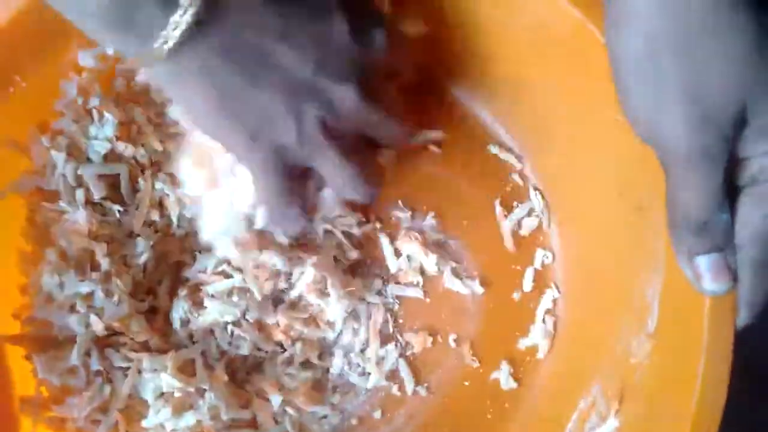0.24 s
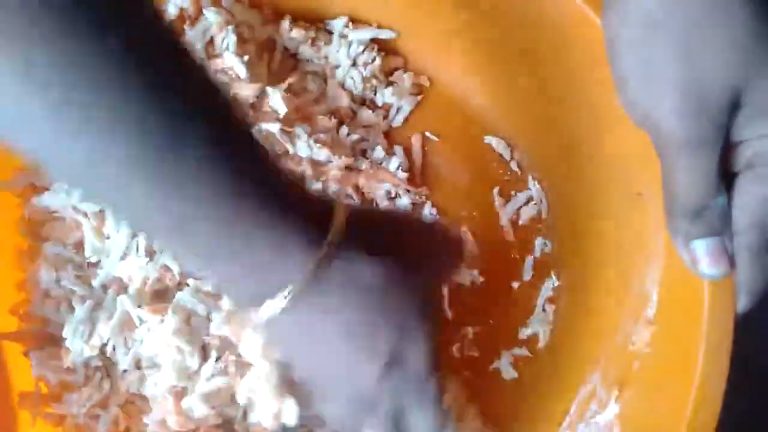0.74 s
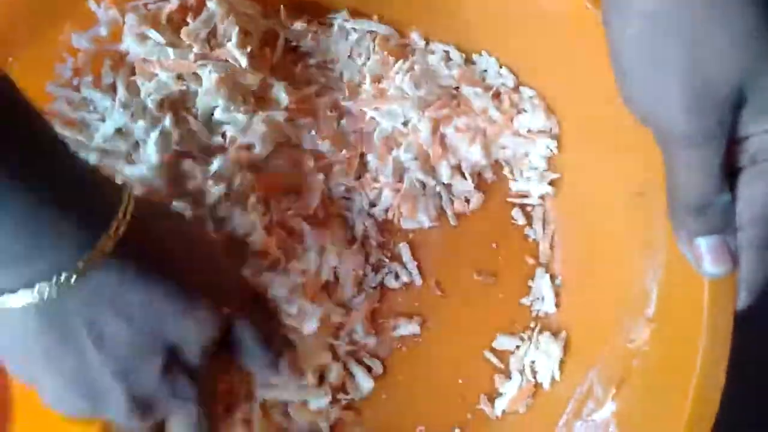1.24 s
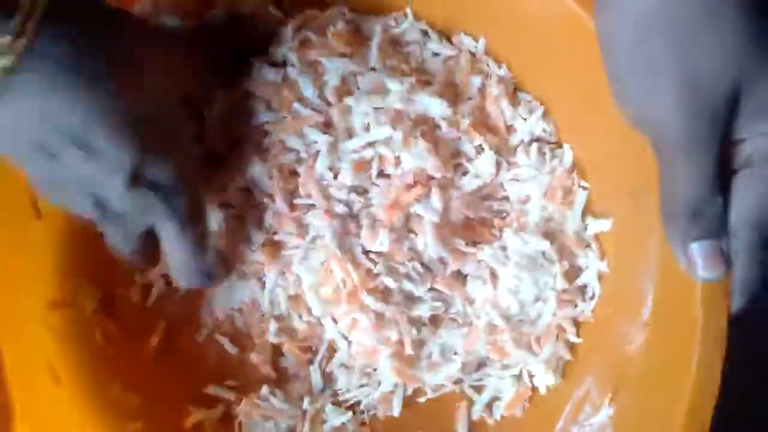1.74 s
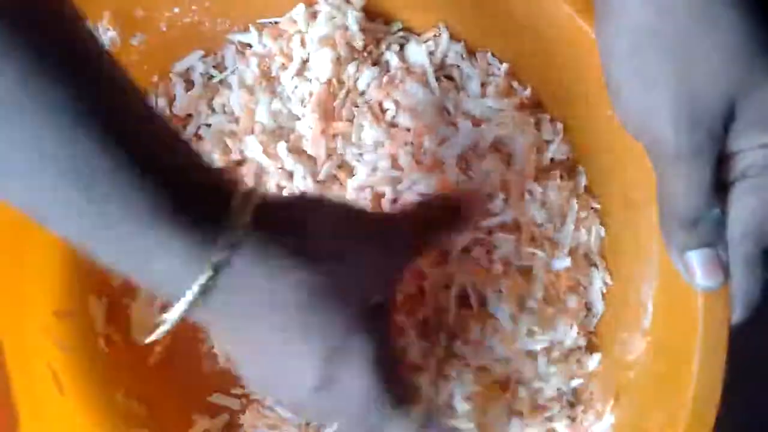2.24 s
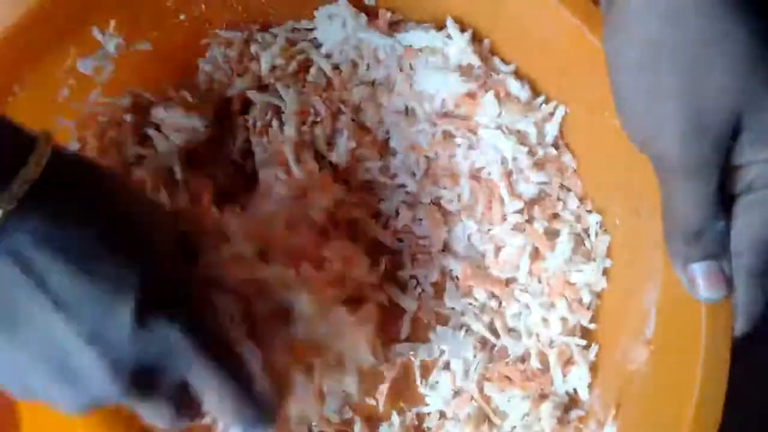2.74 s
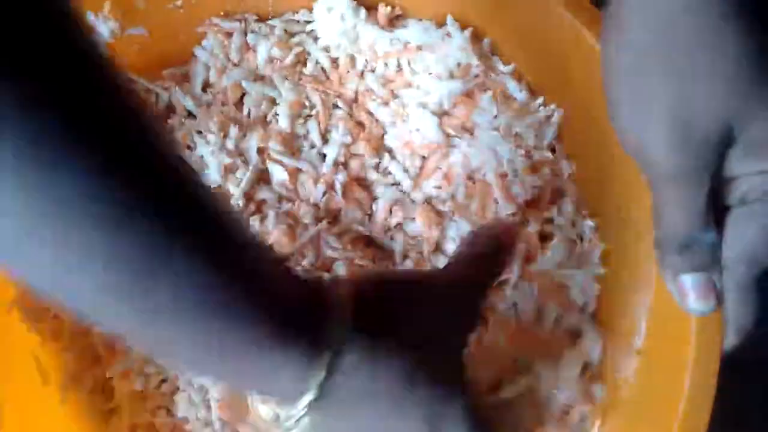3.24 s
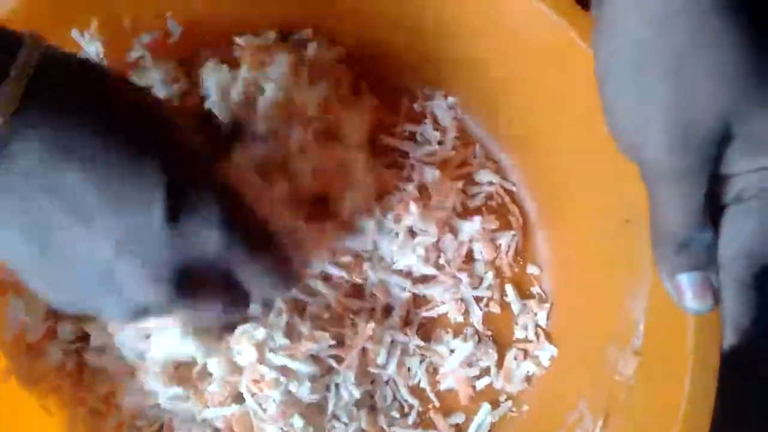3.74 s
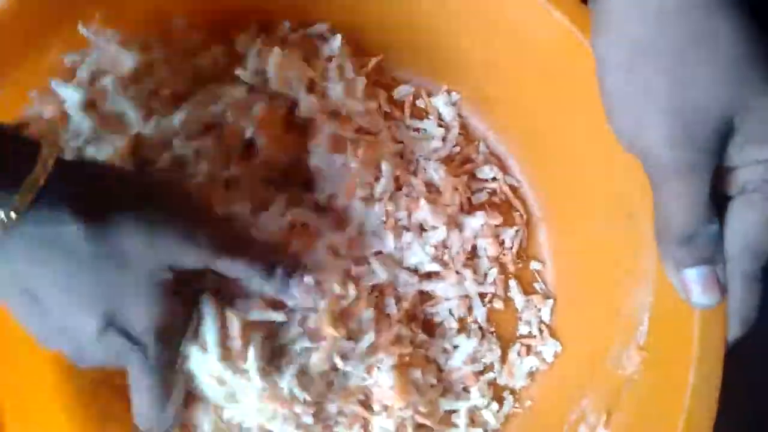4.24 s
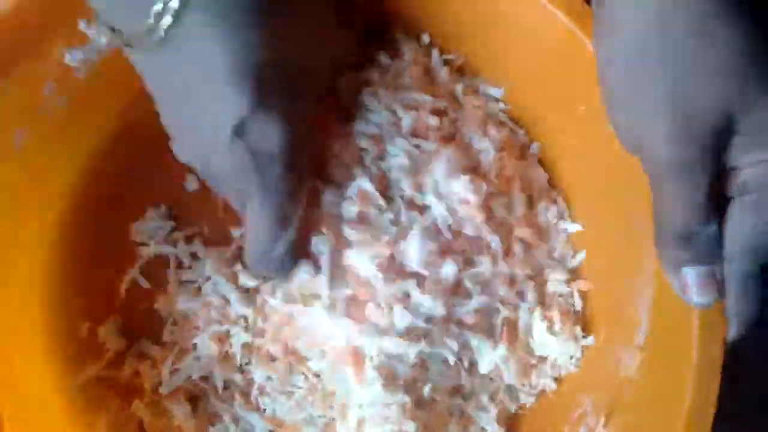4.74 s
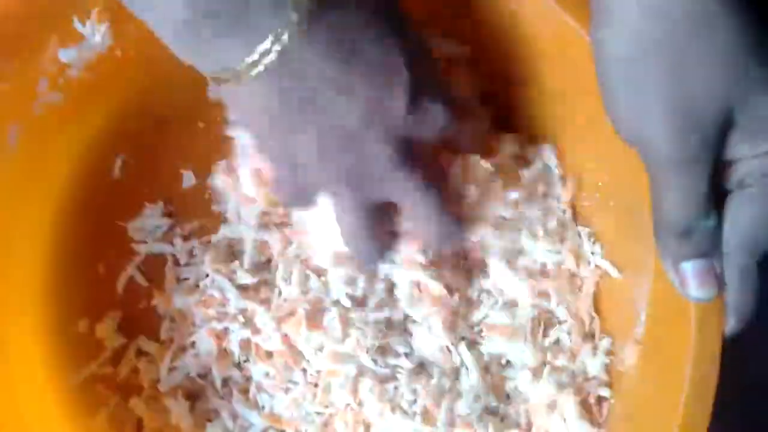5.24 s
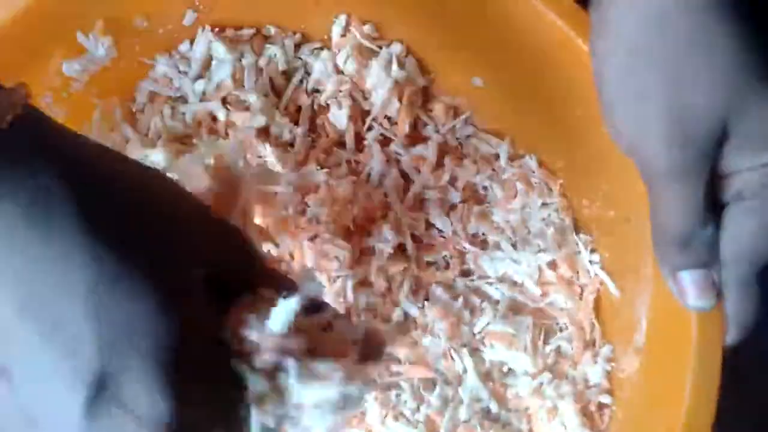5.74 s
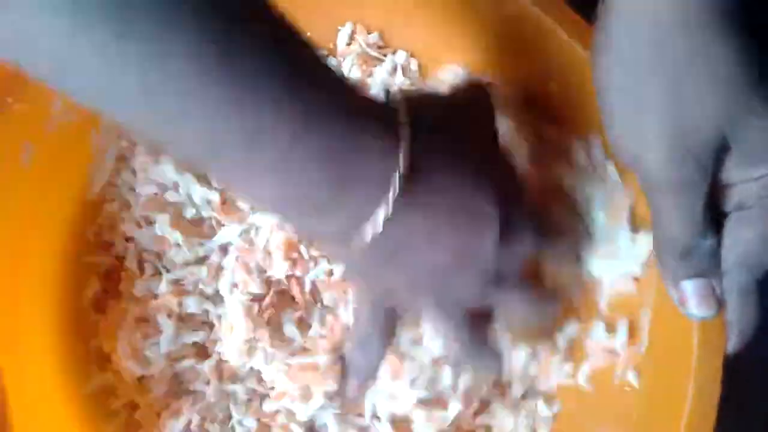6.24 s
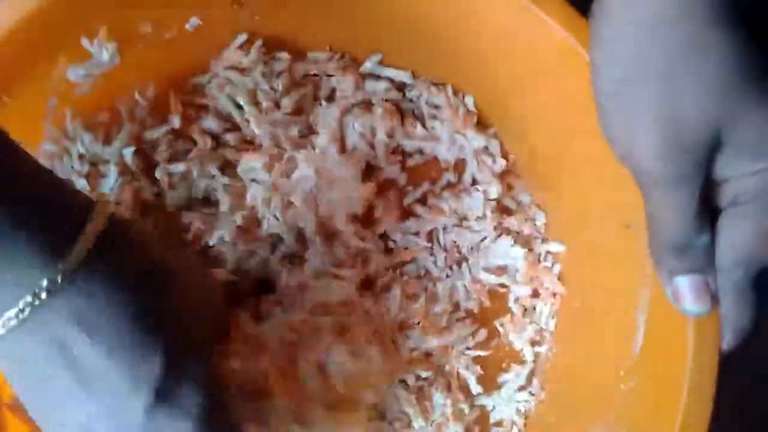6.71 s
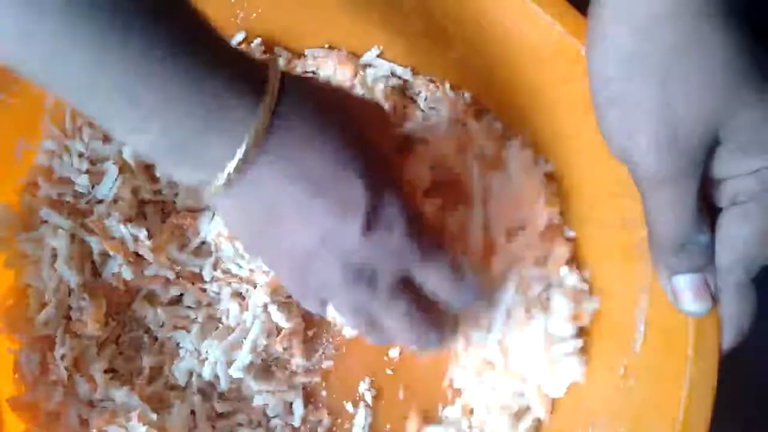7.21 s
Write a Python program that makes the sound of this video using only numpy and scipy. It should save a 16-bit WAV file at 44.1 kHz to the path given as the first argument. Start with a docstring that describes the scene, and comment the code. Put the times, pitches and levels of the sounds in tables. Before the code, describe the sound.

Close up in a small kitchen, a hand sweeps moist grated vegetables around a plastic bowl in short rustling strokes. Fingers and clumps tap the wall with brief hollow ticks, and tiny shreds snap. A hard knock rings out just before two seconds and another just before five. A distant hoarse crow calls faintly three times over low room hum and soft hiss.

```python
"""Grated vegetables stirred by hand

A hand stirs and squeezes grated vegetables in a plastic bowl, close to a mono microphone in a small kitchen.
Each sweep is made of tiny stick-slip clicks: moist shreds rustle, rub the bowl and fizz as they part.
Fingers and falling clumps set the modes of the bowl ringing; twice it is knocked hard, once it is shoved.
A distant bird, probably a crow, calls three times in wavering harmonics over the low hum of the kitchen."""
import sys
import numpy as np
from scipy import signal
from scipy.fft import rfft, irfft
from scipy.io import wavfile

SR = 44100
rng = np.random.default_rng(int(sys.argv[2]) if len(sys.argv) > 2 else 0)


def to_wav(sig):
    """Store sig (one row per channel, or 1-D mono) as 16-bit WAV at the path in sys.argv[1].

    Samples outside -1..1 are clipped; the rate is SR.
    """
    pcm = np.clip(np.atleast_2d(sig), -1, 1) * 32767
    pcm = np.round(pcm).astype(np.int16)
    wavfile.write(sys.argv[1], SR, pcm.T)  # frames by channels


N = 329423
BLOW_TIME = np.arange(6000) / SR  # seconds after a blow


def amp(db):
    """Decibels to gain."""
    return 10 ** (np.asarray(db) / 20)


def unit(x):
    """Scales to rms 1."""
    return x / np.sqrt(np.mean(x ** 2) + 1e-20)


def topped(x):
    """Scales to peak 1."""
    return x / abs(x).max()


def read(points, hz):
    """Reads a table on a log-frequency axis."""
    f, value = np.transpose(points)
    return np.interp(np.log(hz + 1), np.log(f + 1), value)


def add(mix, s, sound):
    """Mixes a sound in at time s."""
    part = mix[round(s * SR):][:len(sound)]
    part += sound[:len(part)]


def colour(x, points, size=2048):
    """Causal filter with the given spectrum: clicks keep a sharp front and ring afterwards."""
    log_gain = np.log(amp(read(points, abs(np.fft.fftfreq(size, 1 / SR)))))
    minimum_phase = np.exp(signal.hilbert(log_gain).conj())
    impulse = np.fft.ifft(minimum_phase).real[:size // 2]
    return signal.oaconvolve(x, impulse)[:len(x)]


def wander(rate_hz):
    """Smooth chance of rms 1, rolling off above the given rate."""
    hz = np.fft.rfftfreq(N, 1 / SR)
    spectrum = rfft(rng.standard_normal(N)) / (1 + (hz / rate_hz) ** 4)
    return unit(irfft(spectrum, N))


def slips(per_s, spread_db, clump_db, clump_hz):
    """Tiny stick-slip clicks of uneven size and either sign that come in clumps."""
    size = amp(spread_db * np.minimum(rng.exponential(1, N), 4)) * rng.choice([-1, 1], N)
    happens = rng.random(N) < per_s / SR
    return size * happens * amp(clump_db * wander(clump_hz))


def mode(hz, t60):
    """One dying vibration."""
    return np.sin(2 * np.pi * hz * BLOW_TIME) * amp(-60 * BLOW_TIME / t60)


def radiate(x, low_hz, order=4):
    """A small open bowl cannot push out the slow part of a blow."""
    return signal.sosfilt(signal.butter(order, low_hz, "high", fs=SR, output="sos"), x)


# Modes of the bowl wall. Each row: pitch in Hz, level in dB before the place of the blow counts, t60 in s.
BOWL = [(485, -9.5, 0.13), (607.7, -7, 0.097), (697, -10.5, 0.088), (910, -7, 0.064), (937, -12, 0.11),
        (1082, -46, 0.052), (1181, 1, 0.04), (1258, -5, 0.056), (1419, 2.5, 0.054), (1564, -1.5, 0.061),
        (1684, 5, 0.026), (1930, -4, 0.1), (2400, -42, 0.046), (2920, -20, 0.014), (3528, 3.5, 0.02),
        (4720, -3, 0.028), (5070, -32, .05), (5785, -7.5, 0.041)]


def wall(spot_hz, focus_db, uneven_db):
    """The bowl's modes start together; focus_db favours those near the pitch of the struck spot."""
    chance = rng.standard_normal(len(BOWL))
    ringing = 0
    for luck, (hz, db, t60) in zip(chance, BOWL):
        off_spot_db = focus_db * np.log2(hz / spot_hz) ** 2
        ringing = ringing + amp(db - off_spot_db + uneven_db * luck) * mode(hz, t60)
    return topped(radiate(ringing, low_hz=438))


# Colour of a snap at the bowl. Each row: frequency in Hz, relative level in dB per Hz.
CRACK = [(300, -6.5), (1200, 6.5), (2600, 0.5), (4000, -3), (5200, -5), (7500, -6.5), (9000, -21),
         (11000, -20.5), (16000, -11)]


def crack(decay_s, tone):
    """The bright snap at the moment of contact: a short burst of coloured noise."""
    burst = rng.standard_normal(len(BLOW_TIME)) * np.exp(-BLOW_TIME / decay_s)
    return topped(colour(burst, tone))


# Low hum of the kitchen, then the hiss. Each row: frequency in Hz, relative level in dB per Hz.
HUM = [(12, -38), (20, 7), (47, -18.5), (63, 1.5), (78, -11), (87, -7), (135, 2), (177, -4.5), (219, -2.5),
       (302, -17.5), (340, -22), (440, -46), (750, -120)]
HISS = [(200, 17), (380, 15), (600, 16), (1200, 2.5), (2000, 9), (3500, -4), (8000, -1.5), (11000, -4.5),
        (13500, -1), (15500, 4.5)]
# Bumps in the microphone's hiss. Each row: centre in Hz, width in Hz, height in dB.
HISS_BUMPS = [(4600, 430, 15.2), (5530, 380, 15.2), (6480, 340, 16.4), (9200, 1030, 12.3)]
HUM_DB, HISS_DB = -55, -60  # rms levels


def background():
    """Low room hum, and the hiss of still air and of the microphone, as shaped noise."""
    hz = np.fft.rfftfreq(N, 1 / SR)
    bumps = sum(db * np.exp(-((hz - f) / width) ** 2) for f, width, db in HISS_BUMPS)

    def shaped_noise(db):
        """Noise of rms 1 with the given spectrum."""
        return unit(irfft(rfft(rng.standard_normal(N)) * amp(db), N))

    hum = shaped_noise(read(HUM, hz))
    hiss = shaped_noise(read(HISS, hz) + bumps)
    return amp(HUM_DB) * hum + amp(HISS_DB) * hiss


# Reverberation of the small kitchen. Each row: frequency in Hz, t60 in s.
KITCHEN = [(200, 0.46), (1200, 0.33), (4000, 0.24), (14000, 0.084)]


def room(x, size=16384):
    """Scattered reflections that build up, then die faster in the treble."""
    hz, t, z = signal.stft(rng.standard_normal(size), SR, nperseg=256)
    decay = amp(-60 * t / read(KITCHEN, hz)[:, None])
    build_up = np.clip(t / 0.0063, 0, 1)
    tail = signal.istft(z * decay * build_up, SR, nperseg=256)[1]
    return signal.fftconvolve(x, tail / np.linalg.norm(tail))[:N]


# Distant calls. Each row: start in seconds, length in s, top pitch in Hz, place of the top 0-1,
# share by which the pitch sags to the end, level in dB ahead of the throat, fade to the end in dB.
CAWS = [(0.255, 0.27, 602, .2, .19, -43, 5.5), (3.038, .25, 607, 0.25, .12, -45.5, 2),
        (5.305, .27, 592.3, .18, 0.14, -42, 4)]
# The crow's throat. Each row: frequency in Hz, gain in dB.
THROAT = [(1000, -18), (1130, -7), (1205, 2), (1400, -14), (1560, 4), (1660, -6.5), (1725, 3.5),
          (1810, -7.5), (2050, -13), (2400, -20)]
# At the start and at the end of a call: depth of the rasp, then share by which the pitch wavers.
CAW_RASP = (0.2, 0.43)
CAW_JITTER = (0.0086, 0.022)
CAW_SCOOP = 0.0494  # share by which a call starts below its top pitch
CAW_RISE_S, CAW_FALL_S = 0.029, 0.028


def crow():
    """Hoarse arching calls; throat and distance leave mainly the second and third harmonics."""
    out = np.zeros(N)
    for s, length, top_hz, top, sag, db, fade_db in CAWS:
        t = np.arange(0, length, 1 / SR)
        u = t / length
        scoop = CAW_SCOOP * (1 - u / top) ** 2
        droop = sag * ((u - top) / (1 - top)) ** 2
        hz = top_hz * (1 - np.where(u < top, scoop, droop))
        waver = 1 + np.interp(u, [0, 1], CAW_JITTER) * wander(153)[:len(t)]
        phase = 2 * np.pi * np.cumsum(hz * waver) / SR
        voice = sum(amp(read(THROAT, k * hz)) * np.sin(k * phase) for k in (2, 3, 4))
        rasp = 1 + np.interp(u, [0, 1], CAW_RASP) * wander(140)[:len(t)]
        edges = np.minimum(t / CAW_RISE_S, 1) * np.minimum((length - t) / CAW_FALL_S, 1)
        add(out, s, amp(db - fade_db * u ** 2) * voice * rasp * edges)
    return out


CRUMBS_PER_S, CRUMBS_DB = 22, -66.5  # rate over both spots, rms level
CRUMB_CRACK_DB = -3.5  # against the ring


def crumbs():
    """Loose shreds drop on the wall with faint ticks, also while the hand rests."""
    ticks = np.zeros(N)
    for hz in (1100, 1550):
        drops = slips(per_s=CRUMBS_PER_S / 2, spread_db=4.5, clump_db=5.5, clump_hz=4.4)
        ring = wall(hz, focus_db=31, uneven_db=-7.0)
        tick = ring + amp(CRUMB_CRACK_DB) * crack(decay_s=0.0025, tone=CRACK)
        ticks += signal.oaconvolve(drops, tick)[:N]
    return amp(CRUMBS_DB) * unit(ticks)


# The bowl is shoved against its support. Each row: start in seconds, level in dB, pitch in Hz, t60 in s.
THUDS = [(1.729, -33.5, 64, 0.063)]


def thuds():
    """A dull low push through the support: one low vibration and a burst of dull noise."""
    out = np.zeros(N)
    for s, db, hz, t60 in THUDS:
        shove = rng.standard_normal(len(BLOW_TIME)) * np.exp(-BLOW_TIME / 0.0049)
        dull = topped(colour(shove, [(100, -20), (400, 9.5), (1200, -18)]))
        add(out, s, amp(db) * (mode(hz, t60) + 0.66 * dull))
    return out


# Single shreds snapping close by. Each row: start in seconds, level in dB before a common trim,
# thin fizz in dB against the crack before a common lift.
SNAPS = [(0.5282, -36.5, -15), (0.6972, -28, -20), (0.8104, -30.5, -5), (0.8232, -27, -4.5),
         (1.3307, -33.5, -3), (1.727, -25.5, -27), (3.1544, -26.5, -22), (4.34, -25.5, -27),
         (4.6284, -24.5, -20), (5.2328, -29, -11)]


def snaps():
    """A shred breaks or peels off with a short wet tick."""
    out = np.zeros(N)
    for s, db, fizz_db in SNAPS:
        snap = crack(decay_s=0.0059, tone=CRACK)
        fizz = crack(decay_s=0.0035, tone=FIZZ)
        add(out, s, amp(db - 4.5) * (snap + amp(fizz_db + 7) * fizz))
    return out


# Fingers and clumps on the bowl. Each row: start in seconds, level in dB before a common trim,
# ring of the struck spot in Hz, crack in dB against the ring before a common lift,
# skid after the first touch 0-1.
TAPS = [(0.139, -26.5, 1480, -6, 1), (0.338, -24.5, 1064, -24, 0.3), (0.453, -30, 1390, -24, .6),
        (0.557, -39, 1140, -15, .5), (0.622, -31, 1010, -32, 0.13), (0.784, -22, 1300, -6, 0.06),
        (0.931, -32, 740, -23, 0.4), (1.204, -30, 1210, -31, .5), (1.222, -25, 1540, -14, .8),
        (1.436, -24.5, 1110, -17, 0.7), (1.452, -23.5, 1710, -8, 0.6), (1.503, -22.5, 1090, -5, 0.1),
        (1.627, -30.5, 865, -24, 0.55), (1.64, -30.5, 1430, -16, .6), (1.669, -25.5, 1370, -34, .55),
        (1.732, -22, 895, -8, 0.16), (1.953, -24, 1640, -18, .7), (2.18, -34.5, 1370, -8, 0.64),
        (2.201, -31.5, 1210, -25, 0.8), (2.217, -33, 1620, -20, 0.4), (2.236, -30, 807, -22, 0.7),
        (2.613, -27, 1230, -21, 0.4), (2.931, -39, 1250, -12, 0.5), (2.963, -29, 1230, -22, 0.83),
        (2.994, -28.5, 1390, -36, 0.5), (3.18, -30, 1270, -25, .8), (3.827, -29, 1220, -12, 0.6),
        (4.138, -31.5, 1550, -20, 0.6), (4.154, -28, 1220, -6.5, 0.8), (4.238, -23.5, 1250, -29, 0.7),
        (4.382, -22, 1346, -16, 0.8), (4.529, -34.5, 910, -26, 0.66), (4.585, -30.5, 1250, -5, 1),
        (4.737, -31, 1140, 0.5, 0.9), (4.8385, -18.5, 960, -6.5, .35), (4.865, -18, 1143, -7.5, 1),
        (5.036, -33.5, 1230, -30, 0.66), (5.089, -33, 1180, -24, 0.5), (5.108, -32, 1210, -28, 0.6),
        (5.149, -33.5, 1430, -29, 0.56), (5.199, -35, 1530, -24, .6), (5.231, -24, 900, -5, 0.44),
        (5.864, -41.5, 865, -24, 0.8), (6.076, -38, 888, -15, 0.64), (6.12, -27, 1210, -12, 0.2),
        (6.32, -24, 1420, -26, 0), (6.818, -28, 1250, -11, 0.9), (6.848, -26, 1260, -30, 0.63),
        (7.01, -37.5, 1260, -5, 1), (7.072, -27.5, 1480, -12, 0), (7.378, -29, 1160, -23, .8)]
PAD_HZ = 2600  # soft fingertips and clumps give little push above this


def taps():
    """Soft blows: the first touch and a brief skid drive the wall and the struck spot."""
    out = np.zeros(N)
    for s, db, hz, crack_db, skid in TAPS:
        touch = 0.15 * skid * rng.standard_normal(len(BLOW_TIME)) * np.exp(-BLOW_TIME / 0.0061)
        touch[0] = 1
        touch = signal.sosfilt(signal.butter(2, PAD_HZ, fs=SR, output="sos"), touch)
        spot = mode(hz, t60=.024)
        body = wall(hz, focus_db=24, uneven_db=2.5) + .9 * spot
        driven = signal.fftconvolve(body, touch)[:len(touch)]
        ring = topped(radiate(driven, low_hz=435))
        add(out, s, amp(db) * (ring + amp(crack_db + 1.0) * crack(decay_s=0.0088, tone=CRACK)))
    return amp(-3.0) * out


# Hard knocks of the bowl. Each row: start in seconds, peak of the ringing body in dB, ring in Hz,
# ring in dB against the wall modes, buzz in dB against the ring, then crack in dB and boom of the base
# in dB against the body, rebound after s, rebound in dB against the body.
KNOCKS = [(1.889, -10.5, 962, 17, -22, -5, -14.5, 0.0072, -10.5),
          (4.7800, -12.5, 870, 1.5, -42, -0.5, -24, .006, -4)]
BOOM_HZ, BOOM_T60_S = 539, 0.034  # the base of the bowl flexes under a hard blow


def knocks():
    """Hard blows ring the bowl loudly; it rebounds and touches again a few milliseconds later."""
    out = np.zeros(N)
    for s, db, hz, ring_db, buzz_db, crack_db, boom_db, rebound_s, rebound_db in KNOCKS:
        ring = mode(hz, t60=.027) * (1 - np.exp(-BLOW_TIME / .002))
        # the flexing wall buzzes near odd multiples of its ring
        buzz = mode(2.83 * hz, t60=0.046) + 0.6 * mode(4.77 * hz, t60=0.027)
        modes = wall(hz, focus_db=0, uneven_db=.5)
        body = modes + amp(ring_db) * (ring + amp(buzz_db) * buzz)
        snap = crack(decay_s=0.0011, tone=CRACK) + 0.45 * crack(decay_s=0.019, tone=CRACK)
        boom = topped(radiate(mode(BOOM_HZ, BOOM_T60_S), low_hz=394))
        rebound = topped(radiate(modes + ring, low_hz=425))
        add(out, s, amp(db) * topped(radiate(body, low_hz=460)))
        add(out, s, amp(db + crack_db) * snap)
        add(out, s, amp(db + boom_db) * boom)
        add(out, s + rebound_s, amp(db + rebound_db) * rebound)
    return out


RELEASE_DB_PER_S = 217  # the shreds settle after each move


def push(attack_s, length, crest, swell_db):
    """One move of the hand: it bites in, swells to the hardest push, eases off and lets go."""
    t = np.arange(0, length + .3, 1 / SR)
    crest_s = np.clip(crest, .05, .95) * length
    effort_db = np.interp(t, [0, crest_s, length], [-swell_db, 0, -swell_db])
    release_db = RELEASE_DB_PER_S * np.maximum(t - length, 0)
    return np.minimum(t / attack_s, 1) * amp(effort_db - release_db)


# Sweeps of the hand through the shreds. Each row: start in seconds, attack in s, length in s,
# place of the hardest push 0-1, swell up to it in dB, then rustle, rubbing on the bowl and fine fizz,
# in dB before the trim of each layer.
STROKES = [(0.0, 0.0033, 0.2, 0.4, 5.5, -42.5, -41, -46.5), (0.181, 0.026, 0.16, 0.8, 1.5, -48, -47, -52.5),
           (0.688, 0.019, 0.1, 0.35, 9, -45, -35, -56), (0.804, 0.035, 0.22, 0.2, 5, -44.5, -45, -48),
           (1.205, 0.019, 0.074, 0.4, 3.5, -46.5, -43, -56),
           (1.277, 0.041, 0.26, 0.85, 9.5, -41.5, -36.5, -49), (1.733, .015, 0.31, 0.71, 8, -44, -39, -51),
           (2.202, .03, 0.17, 0.2, -4, -66.5, -63, -76), (2.346, 0.056, 0.44, 0.83, 13.5, -42.5, -38, -50),
           (2.72, 0.026, 0.13, 0.83, 5, -47, -42, -54), (3.144, 0.048, 0.32, .62, 0.5, -49.5, -46.5, -54.5),
           (3.44, 0.038, 0.29, 0.4, 3.5, -48.5, -45.5, -53), (3.723, 0.045, 0.13, 1, 8, -51.5, -44.5, -64),
           (4.162, 0.033, 0.13, 0.35, 4, -46, -46, -54.5),
           (4.266, 0.016, 0.19, 0.63, 7.5, -44.5, -39.5, -53.5), (4.592, 0.053, 0.2, 0, 6, -45, -37.5, -52),
           (4.771, 0.0089, 0.15, 0.44, 7, -44, -36, -49.5),
           (5.218, 0.08, 0.33, 0.41, 9.5, -46, -44.5, -52.5), (5.76, 0.046, 0.19, .8, 9, -79, -80, -64),
           (6.159, 0.066, 0.32, 0.65, 4.5, -46, -44, -50.5), (6.459, .03, 0.29, 0.53, 7, -44, -40.5, -51),
           (7.145, 0.065, 0.37, 0.29, 5, -47.5, -44, -55)]
# Between sweeps the fingers knead a clump against the wall.
# Each row: start in seconds, length in s, level in dB.
KNEADS = [(0.36, 0.18, -50), (0.516, 0.13, -54), (1.156, 0.043, -54), (1.545, 0.15, -50.5),
          (2.038, 0.075, -52.5), (2.197, 0.082, -46.5), (2.88, 0.36, -61), (4.95, 0.13, -58),
          (5.132, 0.16, -50.5), (5.51, 0.13, -53), (5.65, 0.12, -67), (6.098, 0.063, -47.5),
          (6.784, 0.075, -52.5), (7.075, 0.12, -58)]
# Rustle, rubbing and fizz in dB: against the knead's level, then of the settling heap.
KNEAD_DB = (-13.5, 1.5, -21.5)
RESTING_DB = (-70, -74, -74)
KNEAD_ATTACK_S, KNEAD_CREST, KNEAD_SWELL_DB = .025, 0.56, 0.5
UNEVEN_DB, UNEVEN_HZ = 0.98, 12  # the heap gives way in small lurches


def hand():
    """Levels of rustle, rubbing and fizz in dB: the powers of all sweeps and kneads add up."""
    moves = []
    for s, attack_s, length, crest, swell_db, *levels in STROKES:
        moves.append((s, push(attack_s, length, crest, swell_db), levels))
    for s, length, db in KNEADS:
        shape = push(KNEAD_ATTACK_S, length, KNEAD_CREST, KNEAD_SWELL_DB)
        moves.append((s, shape, np.add(db, KNEAD_DB)))
    power = np.outer(amp(RESTING_DB) ** 2, np.ones(N))
    for s, shape, levels in moves:
        for layer, db in zip(power, levels):
            add(layer, s, (amp(db) * shape) ** 2)
    return 10 * np.log10(power) + UNEVEN_DB * wander(UNEVEN_HZ)


# Colours of the three layers. Each row: frequency in Hz, relative level in dB per Hz.
RUB = [(150, -23.5), (350, -37), (500, -13.5), (700, -7.5), (880, -5.5), (1030, -9.5), (1200, 1),
       (1400, -4), (1700, -5), (2000, -13.5), (2500, -29.5), (4000, -42.5)]
RUSTLE = [(300, -32.5), (900, 2.5), (2000, 1.5), (2600, -0.5), (3200, 1), (4500, 1), (5600, -2), (7200, -1),
          (8400, -9.5), (10500, -35.5), (16000, -16)]
FIZZ = [(3000, -56), (7000, -14), (9000, -11), (11000, -10), (12500, -8), (14000, -3.5), (15500, -3.5),
        (17000, -5)]


def sweeps():
    """Shreds drag along the wall, slide over each other and fizz as their wet faces part."""
    rustle_db, rub_db, fizz_db = hand()
    dragging = slips(per_s=2200, spread_db=-0.5, clump_db=1.5, clump_hz=54)
    sliding = slips(per_s=7000, spread_db=-1.0, clump_db=0.63, clump_hz=70)
    parting = slips(per_s=9800, spread_db=-3.0, clump_db=0.6, clump_hz=60)
    # stiff ends catch and flick, setting different spots of the wall ringing
    flicks = np.zeros(N)
    for hz in (950, 1250, 1650):
        catches = slips(per_s=45, spread_db=5.5, clump_db=2.0, clump_hz=22)
        ring = wall(hz, focus_db=25.5, uneven_db=-4)
        flicks += unit(signal.oaconvolve(catches, ring)[:N])
    breaks = slips(per_s=130, spread_db=3.5, clump_db=7, clump_hz=11)
    crackle = signal.oaconvolve(breaks, crack(decay_s=0.0047, tone=CRACK))[:N]
    # when the fingers knead without sweeping, rubbing outweighs rustle and breaks up into separate flicks
    kneading = np.clip((rub_db - rustle_db) / 26, .15, .65)
    rubbing = np.sqrt(1 - kneading) * unit(colour(dragging, RUB)) + np.sqrt(kneading) * unit(flicks)
    rustling = amp(0.6) * unit(colour(sliding, RUSTLE)) + amp(-11.5) * unit(crackle)
    fizzing = unit(colour(parting + 0.69 * sliding, FIZZ))
    return amp(rub_db - 1.5) * rubbing + amp(rustle_db) * rustling + amp(fizz_db + 3.0) * fizzing


def scene():
    """Everything sounds in a small kitchen; both channels carry the same signal."""
    blows = taps() + snaps() + knocks() + thuds()
    mixing = sweeps() + crumbs()
    bird = crow()
    # the distant bird sends the largest share of its sound into the echo
    echo = room(amp(-19) * blows + amp(-17) * mixing + amp(-13) * bird)
    mono = blows + mixing + bird + echo + background()
    return np.array([mono, mono])


EDGE_HZ = 15900


def record(dry):
    """The recorder's band limit: a steep low-pass."""
    low_pass = signal.firwin(511, EDGE_HZ, window=("kaiser", 9), fs=SR)
    return signal.oaconvolve(dry, low_pass[None], "same")


dry = scene()
out = record(dry)
to_wav(out)
```